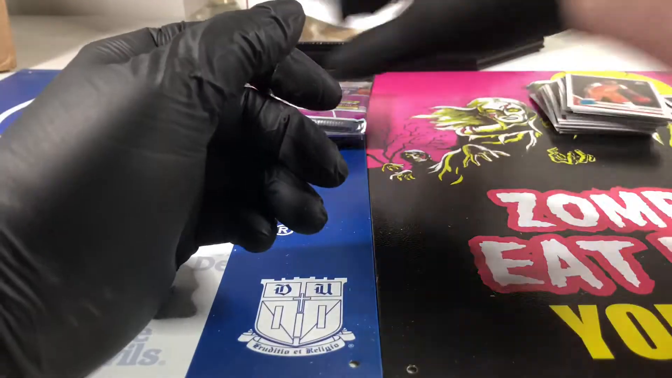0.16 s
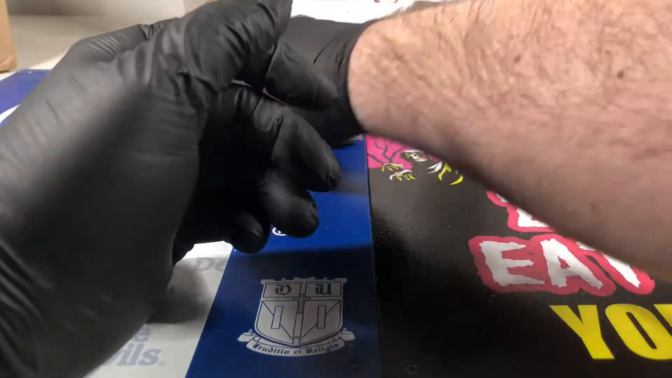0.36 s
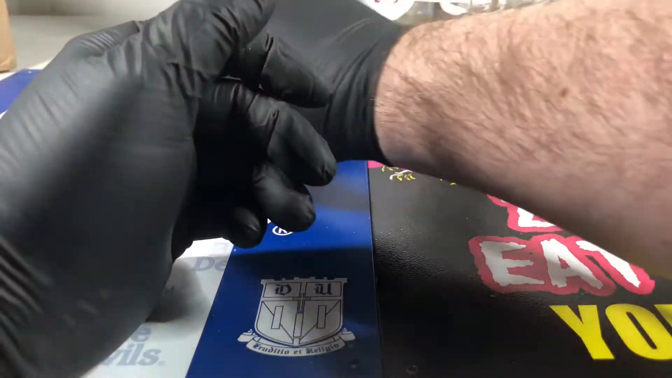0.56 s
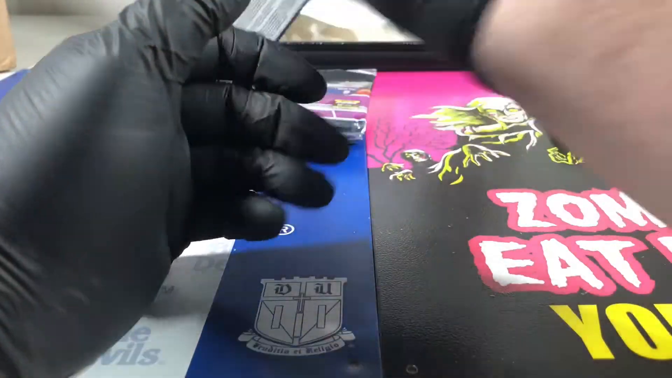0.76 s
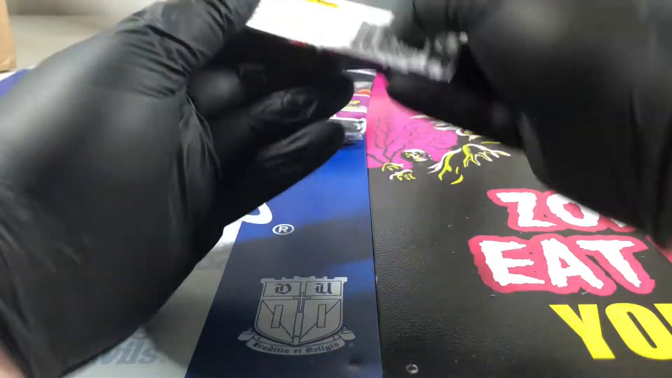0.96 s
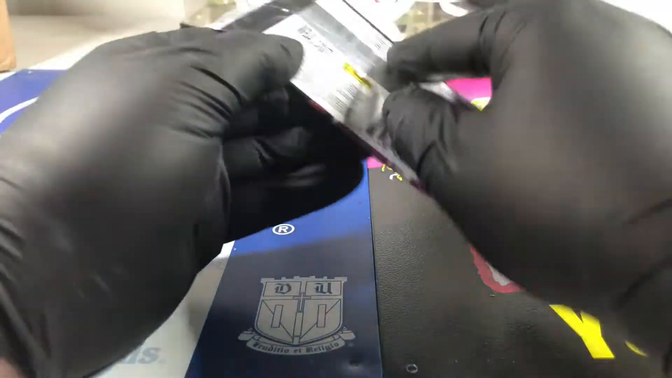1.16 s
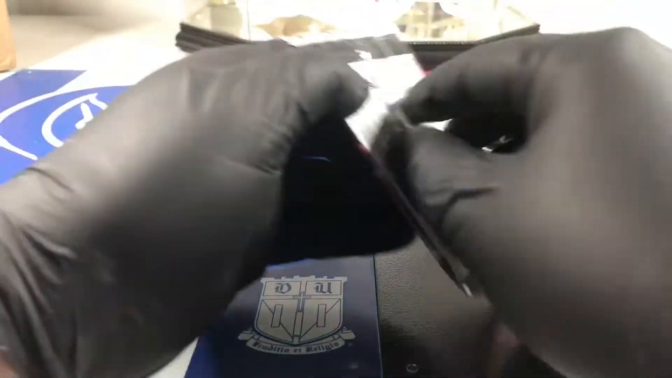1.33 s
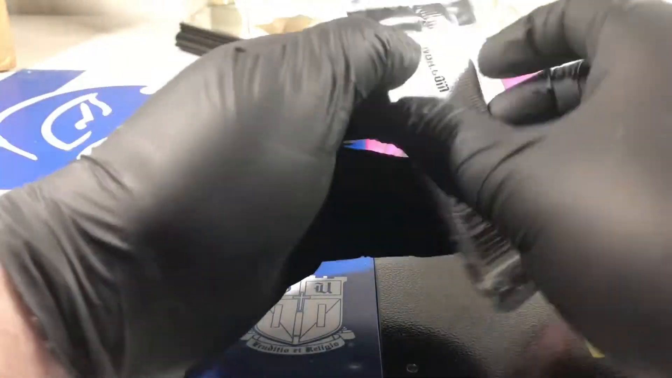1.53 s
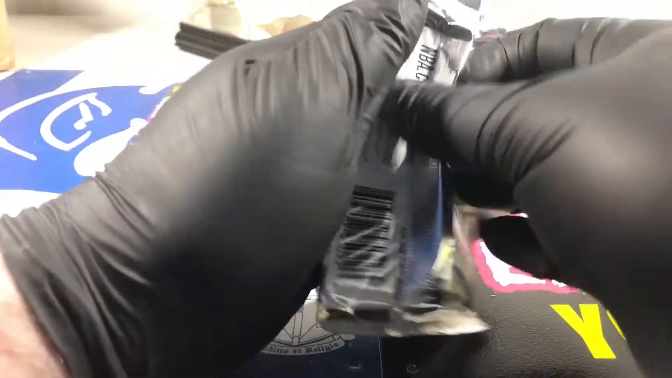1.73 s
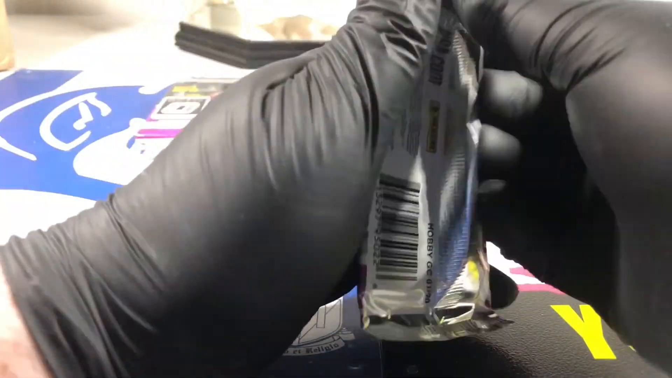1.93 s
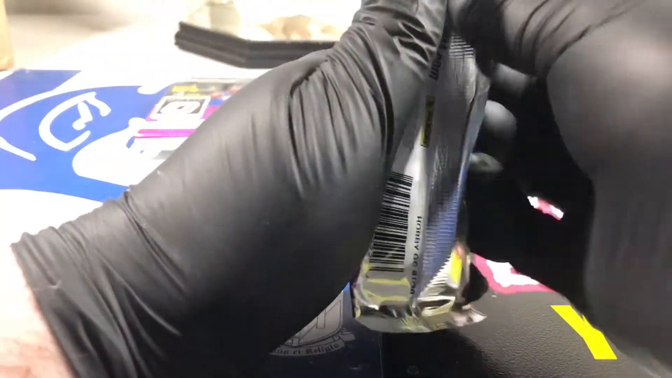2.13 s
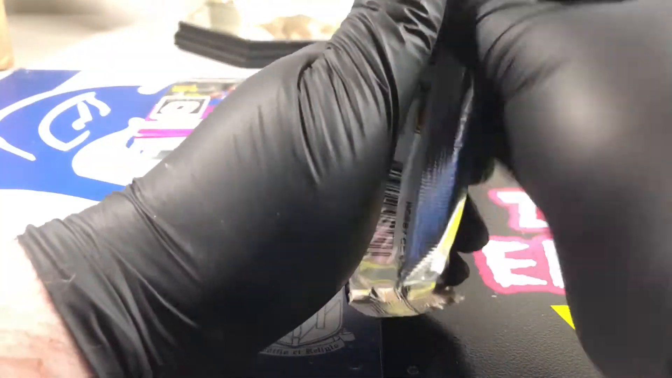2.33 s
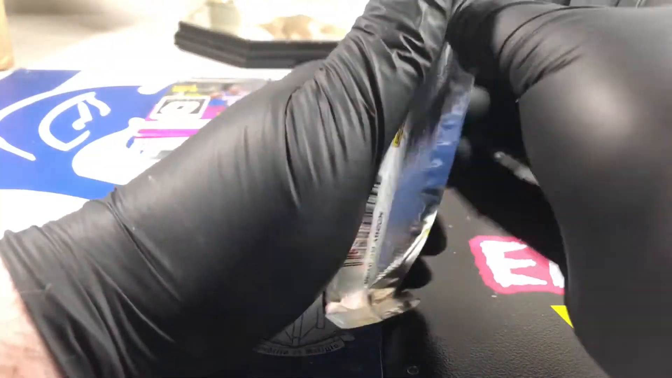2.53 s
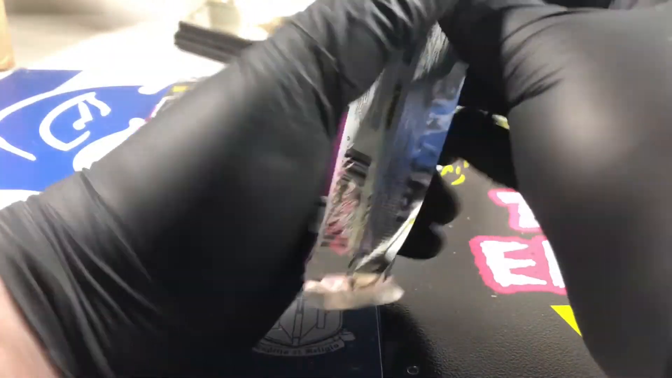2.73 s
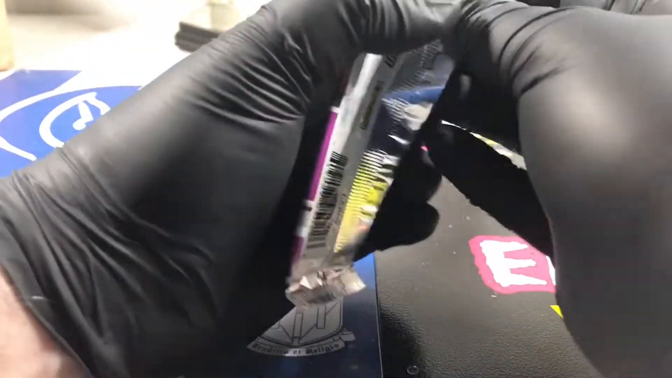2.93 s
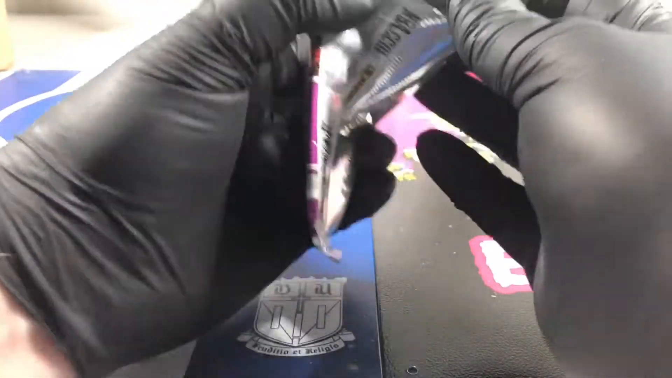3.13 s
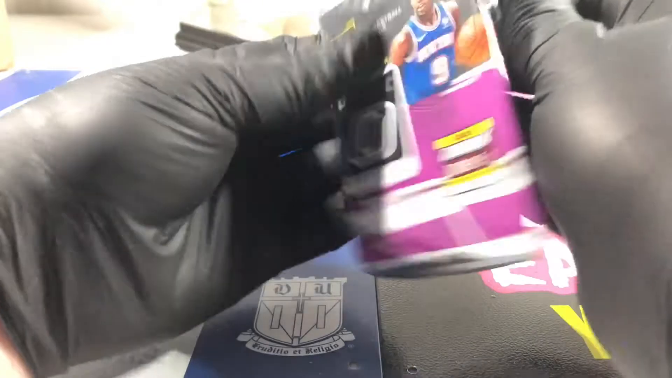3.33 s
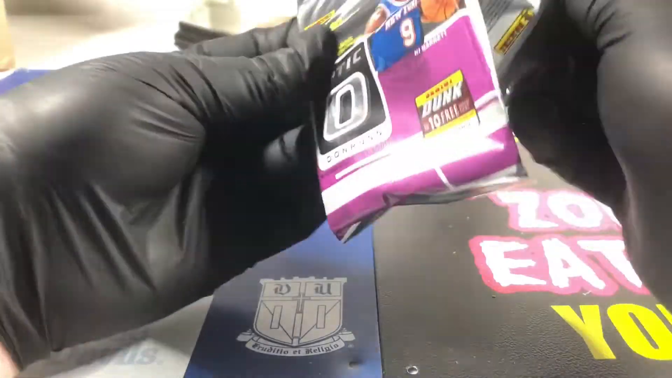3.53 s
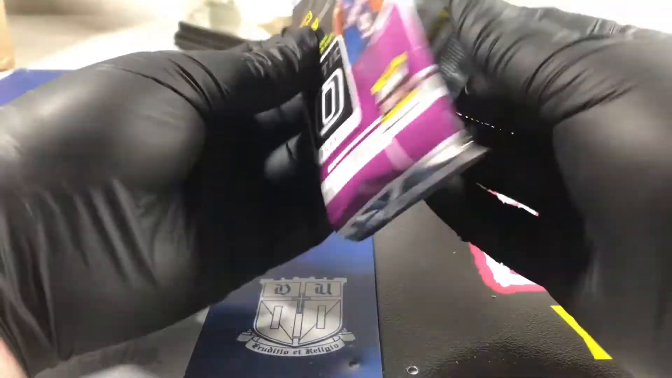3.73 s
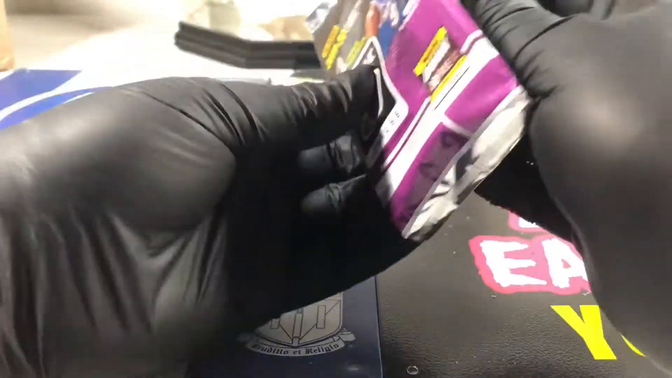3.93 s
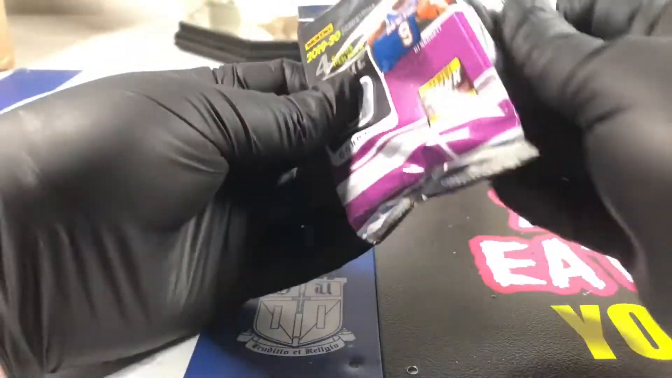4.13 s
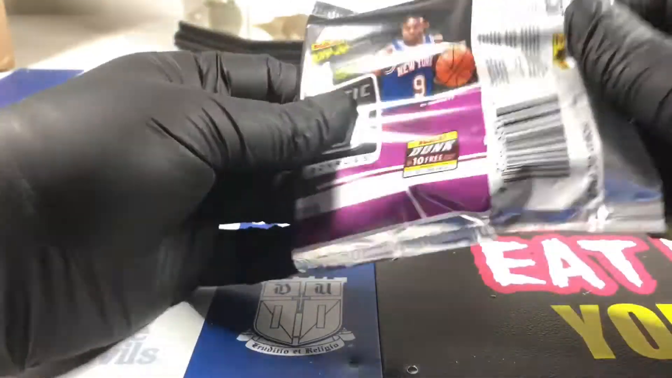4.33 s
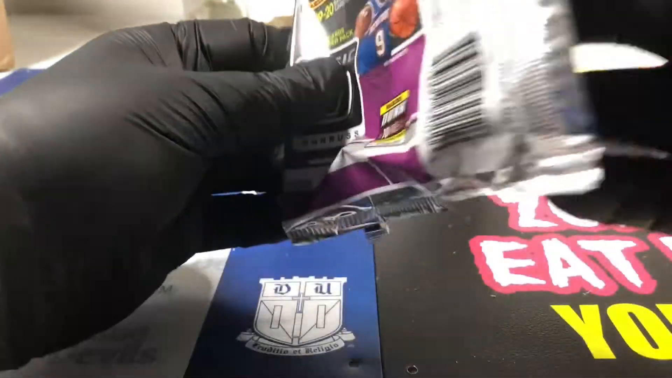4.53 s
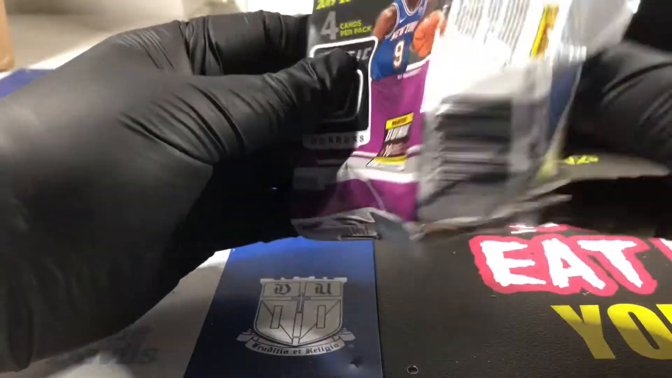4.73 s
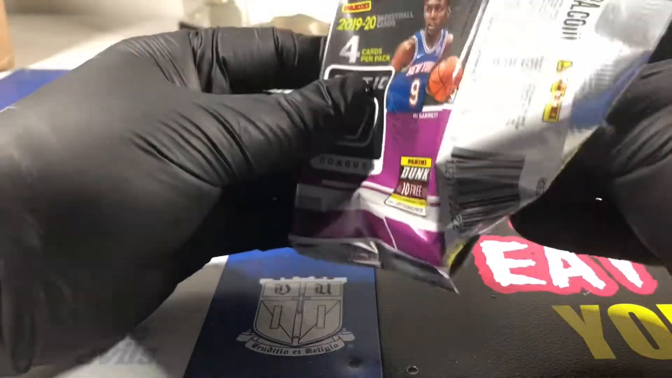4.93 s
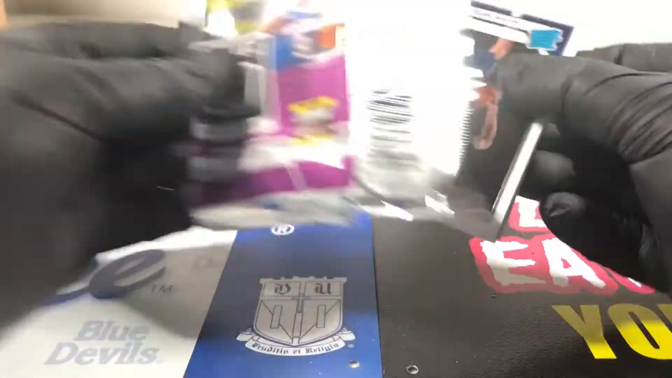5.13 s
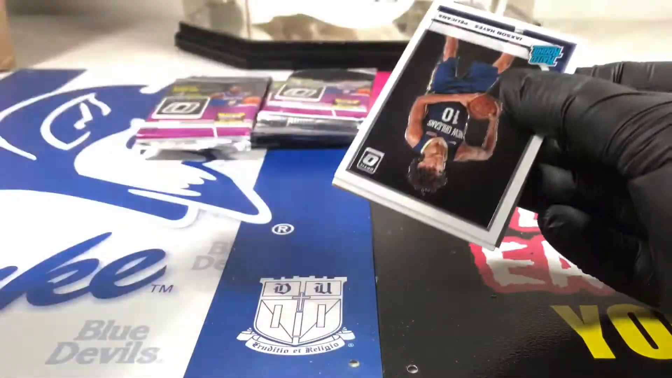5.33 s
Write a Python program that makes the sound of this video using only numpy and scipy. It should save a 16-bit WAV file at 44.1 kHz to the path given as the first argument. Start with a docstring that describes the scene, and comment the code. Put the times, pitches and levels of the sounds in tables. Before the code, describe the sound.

Very close to the microphone in a small quiet room, gloved hands pick up a foil packet with faint rustles and soft thuds. Crisp crackling thickens from about one and a half seconds, peaks in hard tearing bursts near three, three and a half and just after four seconds, then eases into light crinkles and a brief slide of cards.

```python
"""A foil pack of trading cards crackles in gloved hands: picked up, pinched, torn open in three pulls, cards slid out.
Place: a small, still room, with the phone's microphone close to the hands. Each big crease that buckles gives
a sharp crack, as a jolt rings a facet, and a slower flex as bending waves cross the sheet.
Swarms of tiny buckles make the tearing, filtered noise makes the gloves rub, scrape and rumble,
falling tones make the pack thud, and a faint tail of decaying noise answers from the room."""
import sys
import numpy as np
from scipy import signal
from scipy.fft import rfft, irfft, next_fast_len
from scipy.io import wavfile
from scipy.ndimage import uniform_filter1d

SR = 44100
rng = np.random.default_rng(int(sys.argv[2]) if len(sys.argv) > 2 else 0)


def unload_wav(signal):
    """Save mono or channel-first audio to the path in sys.argv[1] as 16-bit WAV at rate SR, clipped to [-1, 1]."""
    wavfile.write(
        sys.argv[1],
        SR,
        np.round(np.clip(np.atleast_2d(signal).T, -1, 1) * 32767).astype(np.int16),
    )


N = 237787
TOP_HZ = 16000  # top of the microphone's range, also the highest pitch of a chattering facet


def undb(db):
    """Decibels to gain."""
    return 10 ** (np.asarray(db) / 20)


def curve(table, column=1):
    """One column of a table, joined by straight lines, at every sample."""
    rows = np.array(table, float)
    return np.interp(np.arange(N) / SR, rows[:, 0], rows[:, column])


def unit(x):
    """Scale to an rms of one."""
    return x / np.sqrt(np.mean(x ** 2))


def freqs(x):
    """Frequencies in Hz of the spectrum along the last axis, kept above zero."""
    return np.maximum(np.fft.rfftfreq(x.shape[-1], 1 / SR), 1)


def colour(x, points):
    """Filter by (Hz, dB) points with minimum phase: nothing sounds before its jolt."""
    hz, db = np.transpose(points)
    size = next_fast_len(x.shape[-1])
    # folding the cepstrum onto positive times makes the filter causal
    fold = 1 + np.sign(size / 2 - np.arange(size))
    fold[0] = 1
    gain_db = np.interp(np.log(freqs(fold)), np.log(hz), db)
    cepstrum = irfft(np.log(undb(gain_db)), size)
    response = np.exp(rfft(cepstrum * fold))
    return irfft(rfft(x, size) * response, size)[..., :x.shape[-1]]


def resonance(f, hz, width):
    """Response of one damped mode, gain one at its centre."""
    return 1 / (1 + 1j * (f * f - hz * hz) / (f * width))


def ring(x, modes):
    """Add the ringing of (Hz, width Hz, dB) modes to a sound."""
    padded = np.pad(x, (0, next_fast_len(len(x)) - len(x)))
    f = freqs(padded)
    gain = 1 + sum(undb(db) * resonance(f, hz, width) for hz, width, db in modes)
    return irfft(rfft(padded) * gain, len(padded))[:len(x)]


def walk(rate):
    """Smooth chance with a spread near one, through this many random points per second."""
    knots = rng.standard_normal(int(N / SR * rate) + 2)
    return 1.2 * np.interp(np.arange(N) / SR * rate, np.arange(len(knots)), knots)


def add(out, s, sound):
    """Mix a short sound in at a time in seconds."""
    start = int(s * SR)
    out[start:start + len(sound)] += sound[:N - start]


def place(times, sizes, grains, lead_size=32):
    """Lay grains out in time, each with the energy of 1 ms at its size."""
    energy = np.sum(grains ** 2, axis=1)
    grains = grains * (sizes * np.sqrt(SR / 1000 / energy))[:, None]
    # the silent lead of a grain falls before its moment
    index = np.round(times * SR).astype(int)[:, None] - lead_size + np.arange(grains.shape[1])
    return np.bincount(np.clip(index, 0, N).ravel(), grains.ravel(), N + 1)[:N]


# Still air of the room around the microphone. Each row: frequency in Hz, relative gain in dB.
AIR_COLOUR = [(25, -28), (70, 6), (220, -8.5), (450, -11), (1200, -12), (3000, -22), (9000, -23),
              (16000, -39.5)]


def air(level_db=-69):
    """The still room: steady coloured noise."""
    return undb(level_db) * unit(colour(rng.standard_normal(N), AIR_COLOUR))


SWELL_POWER = 1.6  # roundness of a squeeze or pull: one is a cusp, two a bell


def swell(s, rise_s, fall_s):
    """Envelope of a push that builds up to a moment and lets go."""
    late = np.arange(N) / SR - s
    distance = np.maximum(-late / rise_s, late / fall_s)
    return np.exp(-np.minimum(distance, 10) ** SWELL_POWER)


# The steady hold on the pack, firmest while it is being opened.
# Each row: time in seconds, effort behind the fine crackle in dB.
GRIP = [(0, -70.5), (0.31, -75.5), (0.34, -61), (0.75, -62), (0.97, -64), (1.49, -58.5), (1.62, -51.5),
        (2.3, -49), (2.7, -48.5), (2.81, -57), (2.95, -51), (4.42, -53), (4.52, -60), (4.95, -55.5),
        (5.21, -54), (5.255, -69.5), (5.39, -67.5)]
GRIP_FLEX_DB = 0.5  # effort of the sheet's flex relative to that
# The fingers press the foil and relax. Each row: hardest moment in seconds, time to relax in seconds,
# effort behind the crackle in dB, effort behind the flex relative to it in dB.
SQUEEZES = [(0.39, 0.036, -58, 10), (0.555, 0.07, -54, -19), (0.797, 0.045, -50, 0),
            (1.06, 0.048, -50, 5.5), (1.24, 0.067, -54, 6), (1.545, 0.025, -43.5, 2),
            (1.676, 0.051, -39, -11), (1.791, .05, -42, -21), (1.976, .035, -42, 2.5),
            (2.069, .015, -33, -17), (2.188, 0.017, -28, -2.5), (2.335, 0.049, -38, -21),
            (2.418, 0.041, -38, -7), (2.553, 0.031, -38, -19), (2.642, 0.038, -41, -33),
            (2.863, 0.032, -42, -11), (2.914, 0.022, -43, -4), (2.985, .03, -27, -11),
            (3.18, 0.043, -46, 4.5), (3.32, .06, -43, 0), (3.59, 0.034, -38, 4.5), (3.755, 0.032, -38, 7),
            (3.87, 0.05, -45.5, 2), (3.925, 0.019, -40.5, -3), (4.059, 0.041, -32, -3.5),
            (4.39, .07, -39, -2), (4.66, 0.024, -46.5, -4), (4.82, 0.039, -47.5, 1),
            (5.03, 0.068, -44.5, 3.5), (5.106, .04, -42, -4)]
PRESS_SHARE = .6  # pressing takes this share of the time that relaxing takes
# The three pulls that tear the wrapper. Each row: hardest moment in seconds, time to build in seconds,
# time to let go in seconds, effort behind the crackle in dB, effort behind the flex relative to it in dB.
PULLS = [(3.055, 0.032, 0.04, -18, -2), (3.457, 0.041, 0.039, -16, -1.5), (4.235, .095, .06, -21.5, -5.5)]


def effort():
    """Effort in dB behind the crackle and the flex: the powers of grip, squeezes and pulls add up."""
    crackle = undb(curve(GRIP)) ** 2
    flex = crackle * undb(GRIP_FLEX_DB) ** 2
    pushes = [(s, PRESS_SHARE * relax_s, relax_s, db, sheet_db) for s, relax_s, db, sheet_db in SQUEEZES]
    for s, rise_s, fall_s, db, sheet_db in pushes + list(PULLS):
        power = (undb(db) * swell(s, rise_s, fall_s)) ** 2
        crackle = crackle + power
        flex = flex + power * undb(sheet_db) ** 2
    return 10 * np.log10(crackle), 10 * np.log10(flex)


# Low rumble of the hands. Each row: frequency in Hz, relative gain in dB.
HAND_COLOUR = [(20, -52), (42, -12), (90, -11), (190, 0.5), (300, -4.5), (450, -9.5), (900, -29.5),
               (2500, -59.5)]
# The hands shift on the mat or around the pack.
# Each row: start in seconds, length in seconds, level in dB before the shuffle trim and unevenness.
SHUFFLES = [(0.008, 0.17, -60), (0.32, 0.067, -50), (0.381, 0.044, -45.5), (0.783, 0.043, -51),
            (1.029, 0.117, -54.5), (4.198, 0.27, -45), (4.537, 0.086, -57), (5.022, 0.19, -53.5)]
# The stiff pack flexes and thuds against the fingers.
# Each row: start in seconds, peak of the swell in dB, starting pitch in Hz, time to swell in seconds.
THUDS = [(0.327, -43, 130, 0.0023), (0.796, -37.5, 446, 0.0034), (1.017, -43.5, 110, 0.0086),
         (1.057, -48, 190, 0.017), (1.084, -58, 171, 0.0082), (1.775, -46, 270, 0.0074),
         (2.171, -42, 334, 0.0015), (3.757, -41, 276.8, 0.0079), (4.002, -42, 217.9, 0.0092),
         (4.231, -30.5, 380.2, 0.0039), (4.426, -35.5, 156, 0.0058), (4.452, -41, 270, 0.0093),
         (4.607, -43, 136.4, 0.0059), (4.65, -45.5, 218, 0.0072)]


def hands(sheet_db, holding_db=-65, carried_db=-28, shuffle_db=-0.5, attack_s=0.01,
          uneven_db=4.5, glide_s=0.024):
    """Hands rumble with flex and shifts; a thud's high bending waves arrive first, so its pitch falls."""
    holding = np.clip((curve(GRIP) + 75) / 10, 0, 1)
    power = (holding * undb(holding_db)) ** 2 + undb(sheet_db + carried_db) ** 2
    for s, length_s, db in SHUFFLES:
        age = np.maximum(np.arange(N) / SR - s, 0)
        shape = np.minimum(age / attack_s, 1) * np.exp(-np.minimum(age / length_s, 2) ** 4)
        power = power + (undb(db + shuffle_db) * shape) ** 2
    rumble = unit(colour(rng.standard_normal(N), HAND_COLOUR))
    out = rumble * np.sqrt(power) * undb(uneven_db * walk(60))
    t = np.arange(SR // 10) / SR
    for s, db, hz, swell_s in THUDS:
        phase = 2 * np.pi * hz * glide_s * (1 - np.exp(-t / glide_s))
        push = t / swell_s * np.exp((1 - (t / swell_s) ** 2) / 2)  # reaches one at swell_s
        add(out, s, undb(db) * np.sin(phase) * push)
    return out


def burst(events, decay_s, size=512, lead_size=32):
    """One row of unit energy per buckle: a ragged jolt that dies away, each at its own pace."""
    t = np.maximum(np.arange(size) - lead_size, 0) / SR
    stretch = np.exp(0.28 * rng.standard_normal((events, 1)))
    jolt = rng.standard_normal((events, size)) * np.exp(-t / (decay_s * stretch)) * (t > 0)
    return jolt / np.linalg.norm(jolt, axis=1, keepdims=True)


def facet(hz, decay_s, width, broad_db):
    """Jolts ring patches of foil, one pitch per row; width is a share of the pitch."""
    jolt = burst(len(hz), decay_s)
    response = resonance(freqs(jolt), hz[:, None], width * hz[:, None]) + undb(broad_db)
    rung = irfft(rfft(jolt) * response)
    return rung / np.linalg.norm(rung, axis=1, keepdims=True)


# Sharp snap of a facet, heard close. Each row: frequency in Hz, relative gain in dB.
CRACK_COLOUR = [(700, -38.5), (1500, -11), (2300, 0.5), (3300, 0.5), (6000, 0), (9500, -1.5), (13000, 1),
                (16000, -5)]


def cracks(hz, decay_s, width, broad_db, chatter_db, chatter_s, chatter_width):
    """A facet snaps through and rings for a few cycles; a neighbour of another size chatters on after it."""
    neighbour_hz = .85 * hz * np.exp(0.47 * rng.standard_normal(len(hz)))
    chatter = facet(np.minimum(neighbour_hz, TOP_HZ), chatter_s, chatter_width, broad_db=-27)
    snap = facet(hz, decay_s, width, broad_db)
    return colour(snap + undb(chatter_db) * chatter, CRACK_COLOUR)


# Duller flex of a larger panel. Each row: frequency in Hz, relative gain in dB.
FLEX_COLOUR = [(50, -30), (140, -20.5), (300, -3.5), (520, -5), (800, -2.5), (1250, -0.5), (1900, -2.5),
               (2800, -7.5), (5000, -36.5)]


def flexes(events, decay_s, lag_s, panel_hz=1250, width=0.6):
    """Bending waves cross a larger panel; low ones travel slower (lag_s is the delay at 1 kHz)."""
    hz = panel_hz * np.exp(.33 * rng.standard_normal(events))
    panel = facet(hz, decay_s, width, broad_db=-1.5)
    phase = 4 * np.pi * lag_s * np.sqrt(1000 * freqs(panel))
    return colour(irfft(rfft(panel) * np.exp(-1j * phase)), FLEX_COLOUR)


def follow(x, db, size=1100):
    """Hold a swarm of grains to a level, leaving its quick detail free."""
    power = uniform_filter1d(uniform_filter1d(x * x, size), size)
    return x * undb(db) / np.sqrt(np.abs(power) + np.mean(x * x) / 1000)


# Narrow low resonances that ring under the flex of the foil.
# Each row: frequency in Hz, width in Hz, gain relative to the direct flex in dB.
FLEX_RINGS = [(784, 130, -3.5), (1045, 20, -2.5), (1290, 27, -5.5), (1730, 20, -5.5)]


def crinkle(work_db, sheet_db, idle_rate=170, tear_rate=750, spread_db=4.0, facet_hz=6600,
            crack_db=-2, flex_db=-6.0, count=2600):
    """Tiny buckles come thicker the harder the foil is pulled; under a light touch it hardly buckles."""
    buckling_db = np.minimum(.5 * (work_db + 48), 0)
    rate = idle_rate + tear_rate * undb(work_db - work_db.max())  # buckles per second
    # random waits, counted in expected buckles, are turned into times
    due = np.cumsum(rng.exponential(size=count))
    passed = np.cumsum(rate) / SR
    s = np.interp(due, passed, np.arange(N) / SR)
    size_chance, pitch_chance, flex_chance = rng.standard_normal((count, 3)).T
    sizes = undb(spread_db * size_chance) * (due < passed[-1])
    hz = facet_hz * np.exp(0.34 * pitch_chance)
    crack_grains = cracks(hz, decay_s=.0006, width=.3, broad_db=-15,
                          chatter_db=-6, chatter_s=.003, chatter_width=.18)
    crack = place(s, sizes, crack_grains)
    flex_grains = flexes(count, decay_s=0.0022, lag_s=0.001168)
    flex = ring(place(s, sizes * undb(1.3 * flex_chance), flex_grains), FLEX_RINGS)
    return undb(buckling_db) * (follow(crack, work_db + crack_db) + follow(flex, sheet_db + flex_db))


# Glove hiss on foil. Each row: frequency in Hz, relative gain in dB.
RUB_COLOUR = [(700, -9), (1600, -2), (3300, 0), (6000, 0), (9000, -2.5), (12000, -4.5), (15500, -6)]
# Resonances of the things around the table, heard in the rub and the room's answer.
# Each row: frequency in Hz, width in Hz, gain relative to the direct sound in dB.
RINGS = [(980, 22, -12.5), (1570, 40, -2.5), (2280, 16, 0), (2885, 58, -4), (3050, 35, -12), (3250, 50, 4),
         (4115, 38, 5.5), (5660, 80, -10)]
# Gloves and cards sliding on foil. Each row: start in seconds, length in seconds, pitch in Hz,
# width in Hz, level in dB before the grain.
SCRAPES = [(0.324, 0.11, 640, 388, -52), (0.326, 0.02, 2200, 1200, -55), (0.545, 0.043, 12500, 6000, -50),
           (0.659, 0.2, 3280, 300, -65), (0.713, 0.077, 4150, 220, -66), (0.857, 0.029, 1530, 1300, -45.5),
           (1.54, 0.06, 5800, 1200, -46.5), (2.296, 0.26, 3233, 910, -49), (4.599, 0.036, 2272, 1283, -43),
           (4.816, 0.038, 2725, 606, -44.5), (4.863, 0.064, 2690, 442, -53), (4.968, 0.14, 5950, 3540, -42),
           (5.016, 0.14, 446.5, 406, -47), (5.092, 0.041, 4996, 1449, -38.5),
           (5.293, 0.036, 1040, 595, -52.5)]


def rubbing(work_db, rub_db=-9, light_db=9.5, grain_db=2, scrape_db=0):
    """Gloves hiss over the held foil, relatively more under a light touch; scrapes have their own pitch."""
    touch = np.clip((work_db + 75) / 10, 0, 1)
    lightness = np.clip((-44.5 - work_db) / 12, 0, 1)
    hiss = unit(ring(colour(rng.standard_normal(N), RUB_COLOUR), RINGS))
    out = hiss * touch * undb(work_db + rub_db + light_db * lightness)
    for s, length_s, hz, width_hz, db in SCRAPES:
        noise = rng.standard_normal(SR // 3)
        age = np.arange(len(noise)) / SR / length_s  # in lengths
        shape = np.minimum(age * 12, 1) * np.exp(-age ** 4)
        scrape = unit(irfft(rfft(noise) * resonance(freqs(noise), hz, width_hz), len(noise)))
        add(out, s, undb(db + scrape_db) * shape * scrape)
    return out * undb(grain_db * walk(250))


# The big creases buckling, close to the microphone. Each row: time in seconds, crack energy in dB over 1 ms,
# pitch of the facet in Hz, flex of the sheet relative to the crack in dB before the flex trim.
SNAPS = [(0.416, -33, 6200, -3.5), (0.44, -30, 6170, -6.5), (0.5452, -25.5, 10200, -12.5),
         (0.7802, -25.5, 7100, -9.5), (0.796, -26.5, 4060, -8), (0.8372, -23.5, 8600, -26),
         (1.039, -30.5, 8700, -11), (1.0549, -31, 3140, 1.5), (1.2185, -21.5, 7750, -11.5),
         (1.2682, -35, 6200, -21), (1.5333, -12, 7100, -18), (1.603, -38, 6900, -3), (1.615, -23, 6540, -9),
         (1.6458, -21.5, 3870, -14), (1.6504, -19.5, 8390, -35), (1.658, -13.5, 4570, -9.5),
         (1.681, -18, 8700, -8), (1.6953, -32, 8950, 2), (1.7094, -19, 7400, -25), (1.726, -14, 8250, -7),
         (1.7543, -19, 4940, -13), (1.769, -20, 7800, -29), (1.7835, -25, 7350, -7),
         (1.812, -26, 8010, -32), (1.868, -26.5, 5200, -17), (1.8929, -30.5, 5240, -6.5),
         (1.9571, -25, 4200, -22.5), (1.9702, -23, 4960, -10.5), (1.9947, -20, 6400, -58),
         (2.0186, -27, 6360, -28), (2.0553, -21, 3470, -14), (2.06, -11.5, 4650, -29.5),
         (2.0769, -9, 7705, -19), (2.171, -17, 6360, -1.5), (2.185, -14, 4700, -19),
         (2.224, -42, 4970, -25), (2.2627, -33.5, 5340, -13), (2.2905, -22.5, 5270, -14),
         (2.3065, -12.5, 5550, -12.5), (2.3342, -18, 7530, -22), (2.3477, -10.5, 6600, -34.5),
         (2.3535, -14, 4730, -33), (2.4172, -26.5, 4500, -19), (2.4286, -11.5, 6460, -43),
         (2.4594, -21, 6040, -21), (2.4733, -28.5, 4540, -5.5), (2.5409, -22, 8740, -25.5),
         (2.5661, -20, 7660, -36), (2.5847, -22.5, 7150, -20), (2.6325, -12, 3970, -12),
         (2.703, -26, 3600, -3.5), (2.768, -30.5, 5300, -3), (2.8365, -8.5, 5100, -17.5),
         (2.8769, -18.5, 3570, -6.5), (2.904, -21, 4800, -5), (2.924, -20, 4300, -6.5),
         (2.929, -20.5, 4400, -12), (2.9682, -13, 4630, -23), (2.9722, -8, 6400, -17),
         (2.9915, -6, 5930, -9), (2.9983, -4.5, 6800, -9), (3.0049, -16, 5160, -20.5),
         (3.0364, -6, 5740, -15), (3.0663, -13.5, 5500, 2), (3.0833, -15.5, 7500, -6.5),
         (3.1203, -17, 3800, -1.5), (3.1763, -22.5, 4950, -2), (3.261, -20.5, 5870, 0),
         (3.2842, -18.5, 6500, -12), (3.304, -28, 7355, -8), (3.33, -25.5, 6430, 3.5),
         (3.3464, -14, 7940, -12), (3.3919, -15.5, 7300, -18.5), (3.4101, -11, 7700, -18),
         (3.427, -8, 8230, -5), (3.4443, 0, 7587, -10), (3.47, -11, 7604, -23), (3.495, -9.5, 9400, -25),
         (3.5389, -12.5, 8700, -24), (3.6075, -16.5, 5818, -8), (3.7177, -20.5, 10200, -11),
         (3.7386, -20.5, 5317, -44), (3.8042, -24, 6860, -7.5), (3.832, -22, 5003, -3),
         (3.848, -28, 6040, 0), (3.9136, -19.5, 4690, 2.5), (3.931, -12, 7060, -30),
         (4.0016, -17.5, 7900, -8.5), (4.0517, -11.5, 5350, -9.5), (4.0754, -12, 5920, -31),
         (4.0874, -17, 7140, -30), (4.1087, -11, 9830, -12), (4.155, -15, 7000, -6),
         (4.1717, -9.5, 6900, -9.5), (4.2098, -9.5, 8650, -0.5), (4.225, -8.5, 8900, -14),
         (4.2382, -16.5, 6400, 5.5), (4.2499, -23, 9600, 8), (4.2789, -21.5, 6630, 8),
         (4.2979, -8, 5000, -3), (4.3035, -10, 8750, -19), (4.352, -12.5, 7750, -14),
         (4.3681, -17.5, 4960, -4), (4.3805, -18, 6840, -3), (4.3965, -18.5, 6350, -5),
         (4.413, -15, 5100, -9.5), (4.4546, -20, 5950, -6.5), (4.5736, -32.5, 3330, -1),
         (4.6473, -13.5, 9250, -11), (4.7409, -26.5, 3090, -17.5), (4.7772, -15, 4000, -12),
         (4.891, -22, 7970, -13.5), (5.094, -36, 5065, -4), (5.1405, -25.5, 4000, -4.5)]


def snaps(crack_db=0.0, flex_db=-3.0, width=0.5):
    """The big creases give way one by one, each a crack and a flex of the sheet."""
    s, db, hz, sheet_db = np.array(SNAPS, float).T
    crack = cracks(hz, decay_s=.0006, width=width, broad_db=-19,
                   chatter_db=-9, chatter_s=.0032, chatter_width=.22)
    flex = place(s, undb(db + sheet_db + flex_db), flexes(len(s), decay_s=0.0024, lag_s=0.000876))
    return place(s, undb(db + crack_db), crack) + ring(flex, FLEX_RINGS)


def lesser_creases(s, db, flex_db, facet_hz=6200, flex_spread_db=7.0):
    """Small creases of assorted pitch, each with its crack and a little flex."""
    pitch, sheet = np.clip(rng.standard_normal((len(s), 2)).T, -2, 2)
    hz = facet_hz * np.exp(.3 * pitch)
    crack = cracks(hz, decay_s=.0006, width=.4, broad_db=-17,
                   chatter_db=-9, chatter_s=.0032, chatter_width=.22)
    flex_sizes = undb(db + flex_db + flex_spread_db * sheet)
    flex = place(s, flex_sizes, flexes(len(s), decay_s=.0018, lag_s=.0009))
    return place(s, undb(db), crack) + ring(flex, FLEX_RINGS)


def neighbours(lag_s=.0045, below_db=-16, spread_db=3):
    """A big crease does not go alone: a small one beside it gives way just after."""
    s, db = np.array(SNAPS, float)[:, :2].T
    when, size = np.clip(rng.standard_normal((len(s), 2)).T, -2, 2)
    return lesser_creases(s + lag_s * np.exp(.6 * when), db + below_db + spread_db * size, flex_db=-18)


def creases(work_db, yield_db=-52, range_db=12, first_db=-34, growth=0.45, spread_db=2.0, count=480):
    """Lesser creases give way at random past the foil's yield, more often and louder with effort."""
    slot, luck = rng.random((count, 2)).T
    size = np.clip(rng.standard_normal(count), -2, 2)
    s = (np.arange(count) + slot) / count * N / SR  # one chance in each equal slot of time
    over_db = work_db[(s * SR).astype(int)] - yield_db
    gives = luck * range_db < over_db
    db = np.where(gives, first_db + growth * over_db + spread_db * size, -np.inf)
    return lesser_creases(s, db, flex_db=-14.5)


# Diffuse answer of the small room. Each row: frequency in Hz, relative gain in dB.
ROOM_COLOUR = [(100, 16), (300, 10), (800, 4), (2000, 4.5), (3500, 2), (6500, 0), (10000, -2), (16000, 4.5)]


def room(x, wet_db=-17, t60_s=0.59, first_s=0.008):
    """A faint, diffuse answer from the table, the things on it and the near walls: decaying noise."""
    t = np.arange(SR // 2) / SR
    diffuse = ring(colour(rng.standard_normal(len(t)), ROOM_COLOUR), RINGS)
    onset = np.clip(t / first_s - 1, 0, 1)
    tail = diffuse * np.exp(-np.log(1000) * t / t60_s) * onset
    return x + undb(wet_db) * signal.fftconvolve(x, tail / np.linalg.norm(tail))[:N]


# The crackle comes in fits as the foil catches and slips: depth in dB, random points per second.
CATCH_DB, CATCH_RATE = 2.7, 170


def scene():
    """Foil and hands in the room, driven by the fingers' effort; worked foil catches and slips."""
    work_db, sheet_db = effort()
    catching = undb(CATCH_DB * walk(CATCH_RATE))
    foil = snaps() + neighbours() + creases(work_db) + catching * crinkle(work_db, sheet_db)
    close = foil + rubbing(work_db) + hands(sheet_db)
    return (room(close) + air())[None]


def record(dry):
    """The phone drops the deepest rumble, rounds the sharpest peaks and cuts the top."""
    ceiling = .56
    low_cut = signal.butter(4, 37, "high", fs=SR, output="sos")
    top_cut = signal.ellip(8, .2, 70, TOP_HZ, fs=SR, output="sos")
    thinned = signal.sosfilt(top_cut, signal.sosfilt(low_cut, dry))
    rounded = ceiling * np.tanh(thinned / ceiling)
    return signal.sosfilt(top_cut, rounded)


dry = scene()
out = record(dry)
unload_wav(out)
```